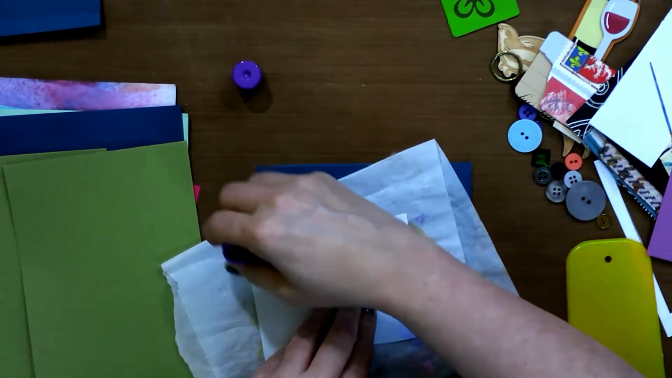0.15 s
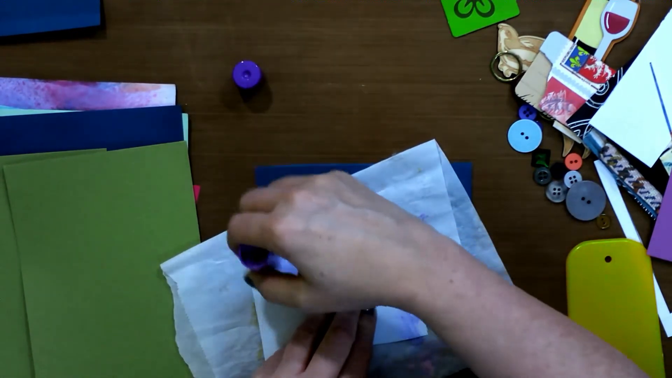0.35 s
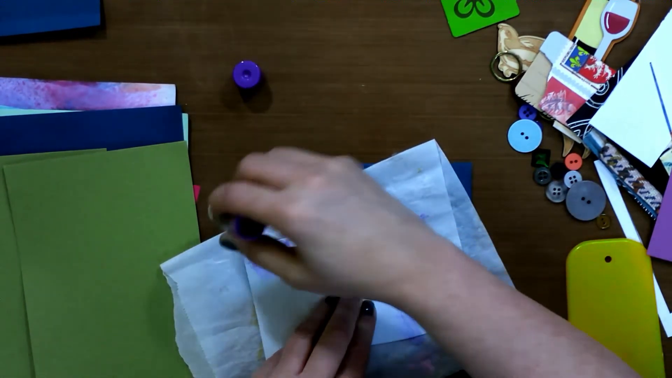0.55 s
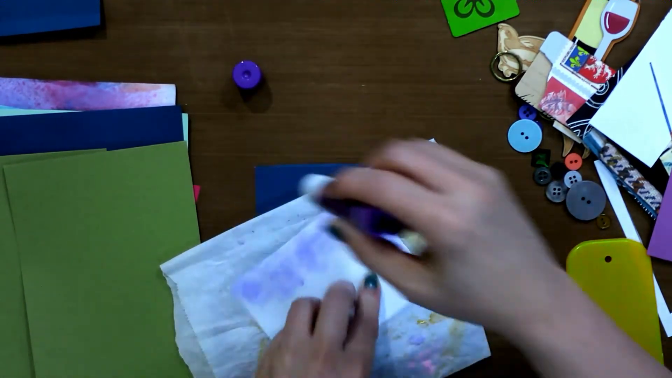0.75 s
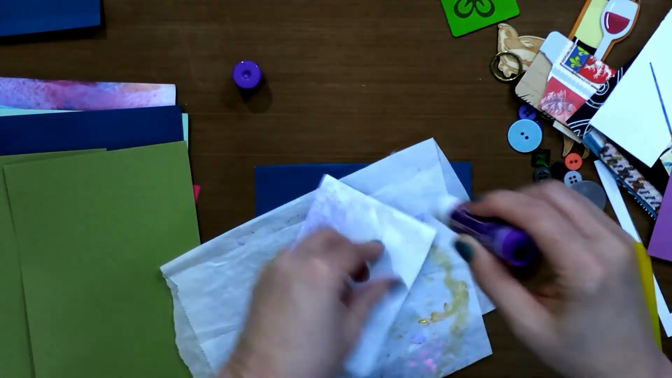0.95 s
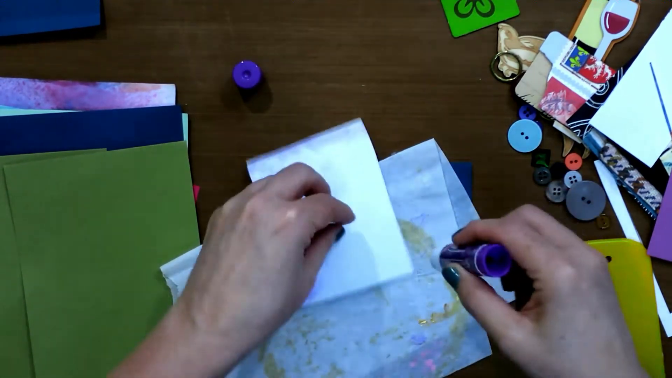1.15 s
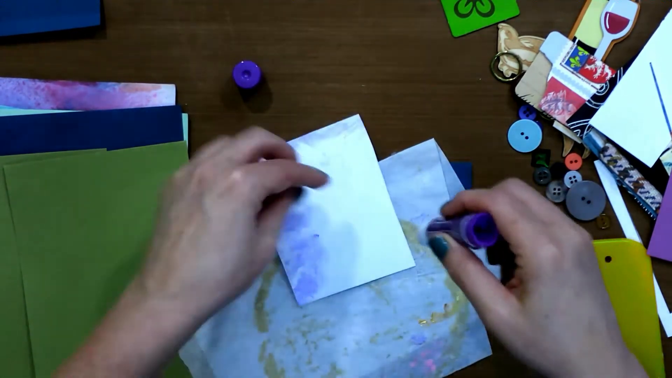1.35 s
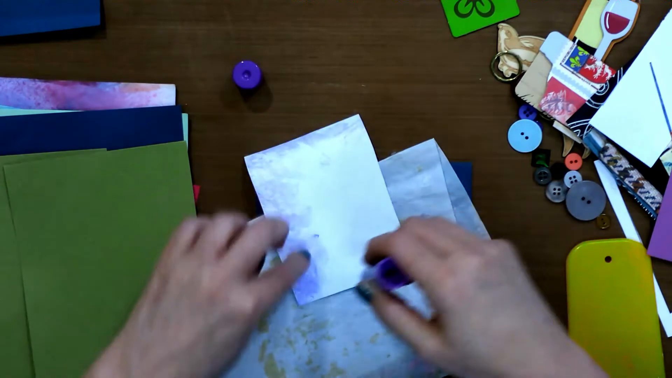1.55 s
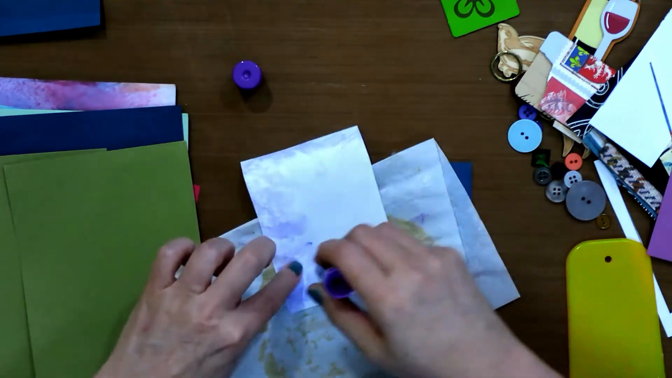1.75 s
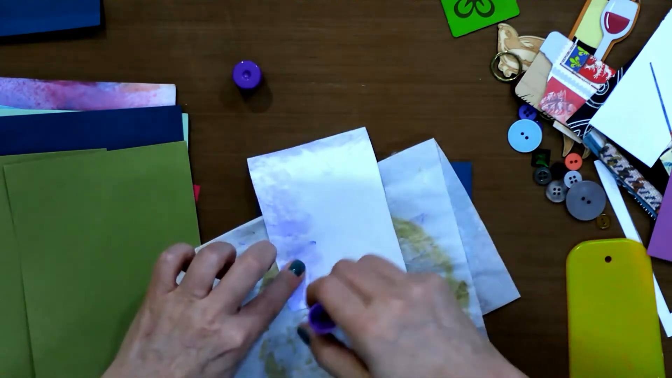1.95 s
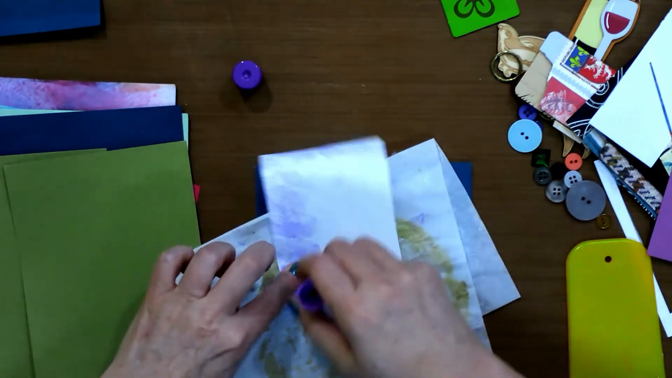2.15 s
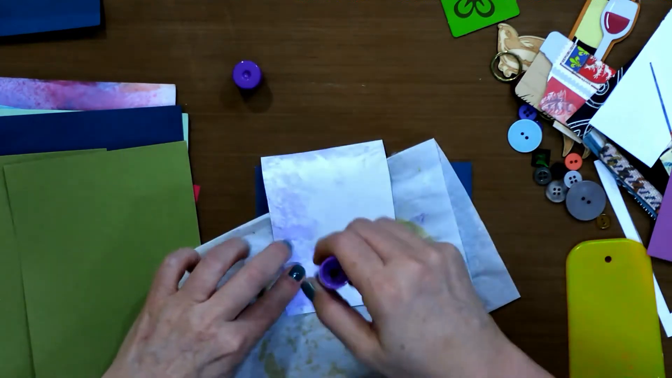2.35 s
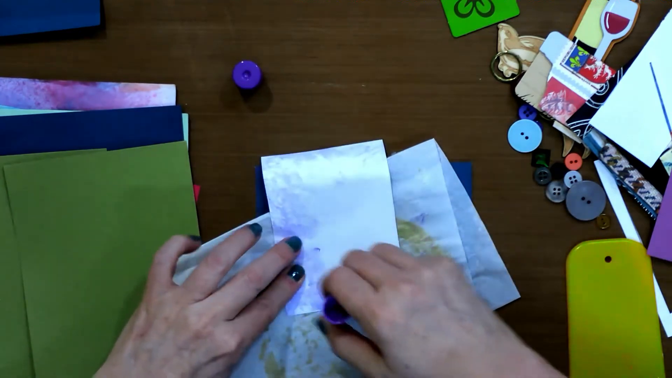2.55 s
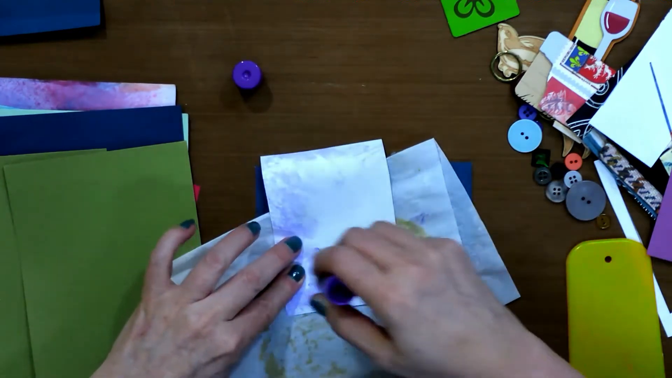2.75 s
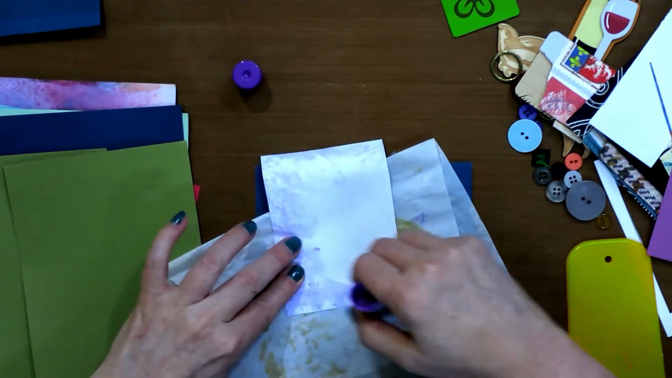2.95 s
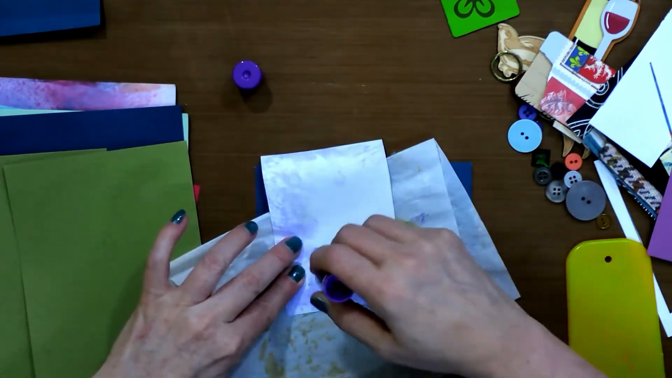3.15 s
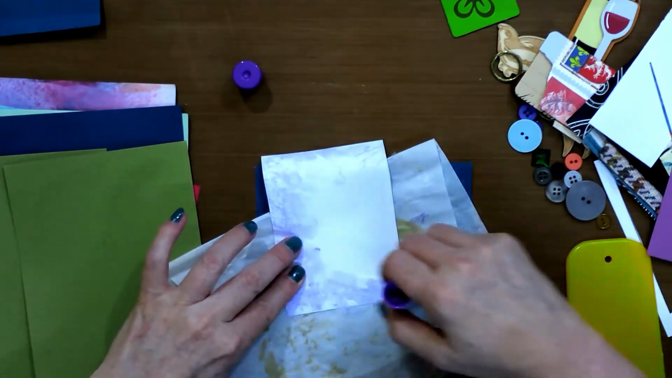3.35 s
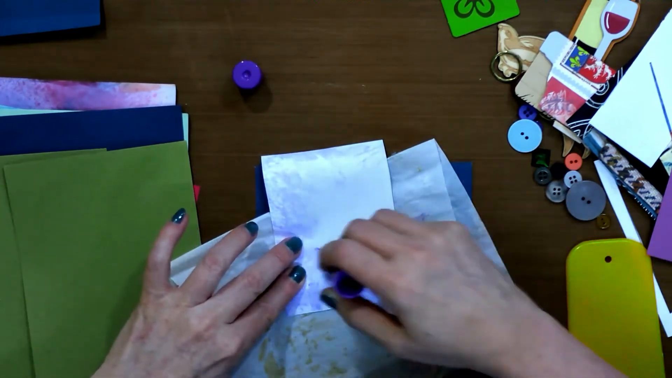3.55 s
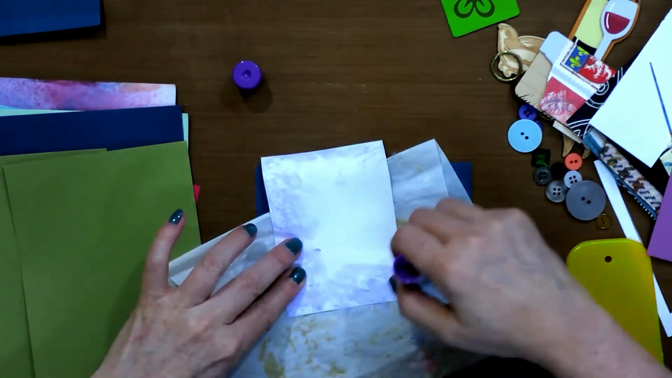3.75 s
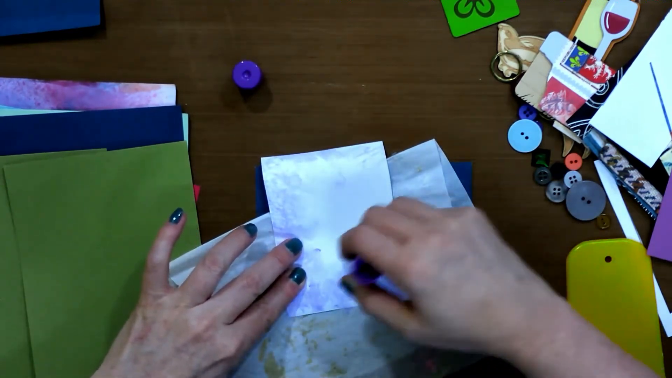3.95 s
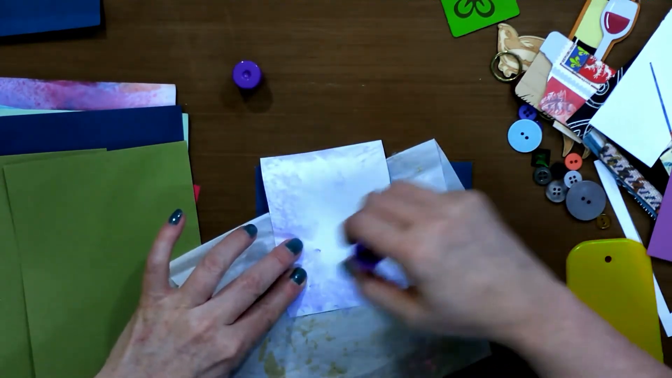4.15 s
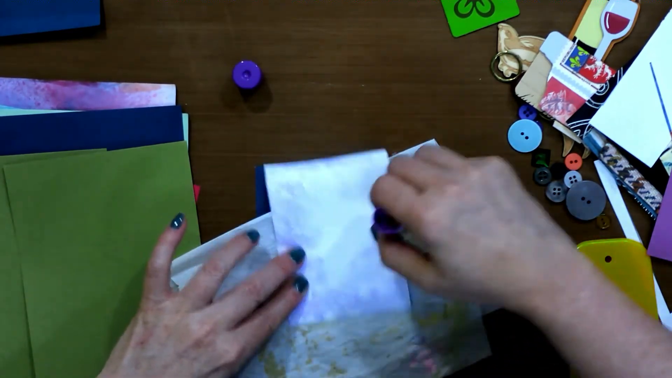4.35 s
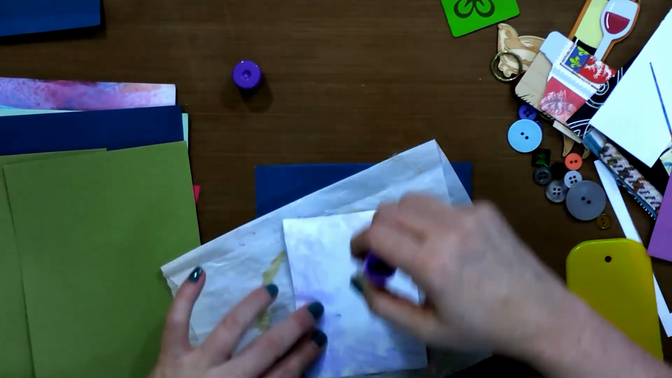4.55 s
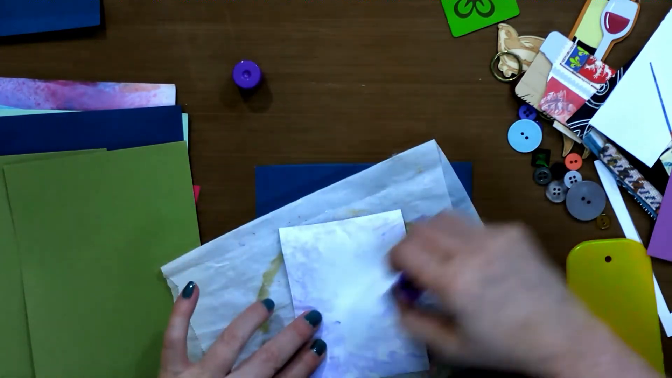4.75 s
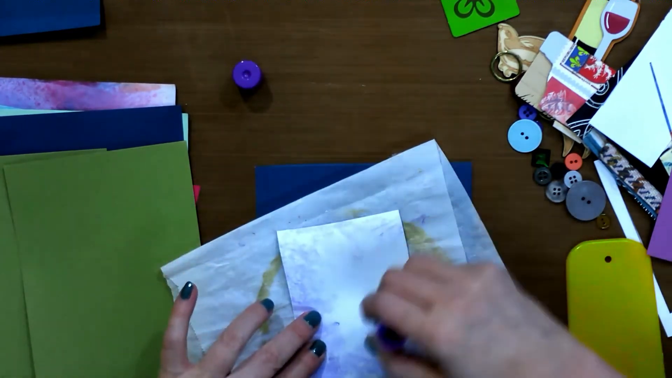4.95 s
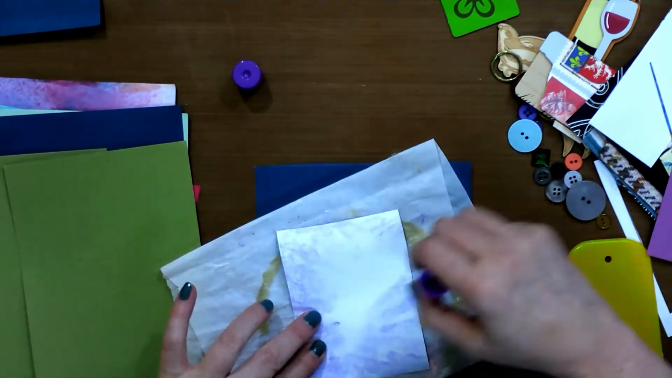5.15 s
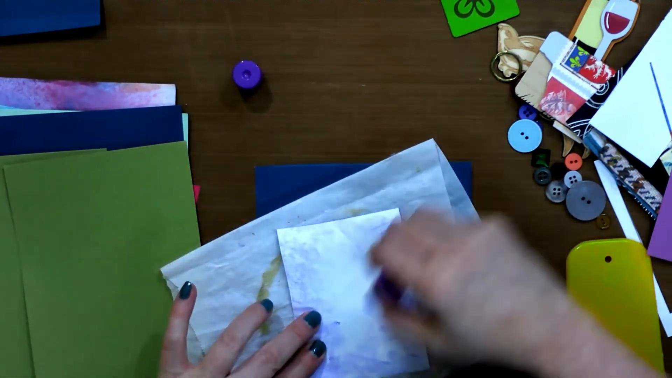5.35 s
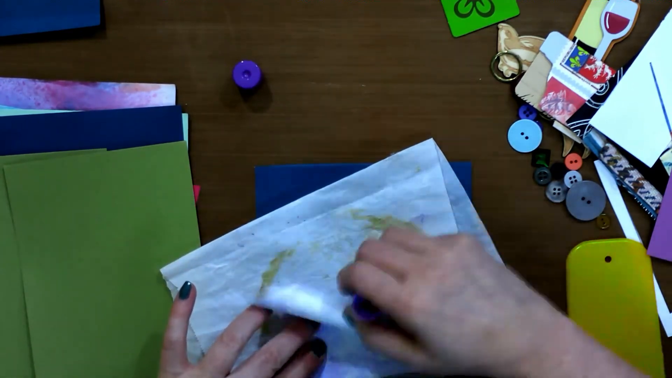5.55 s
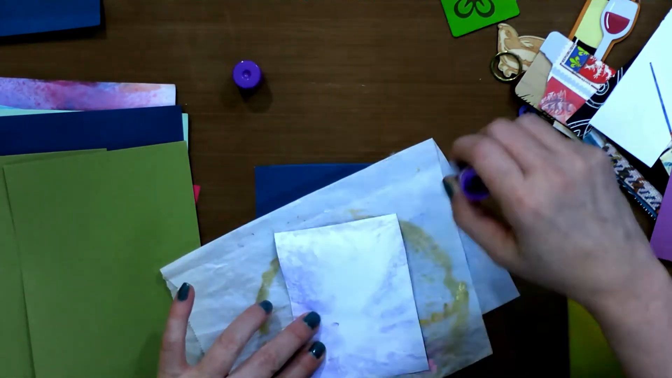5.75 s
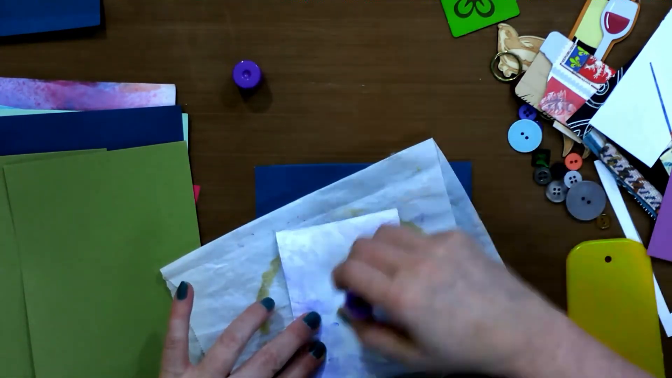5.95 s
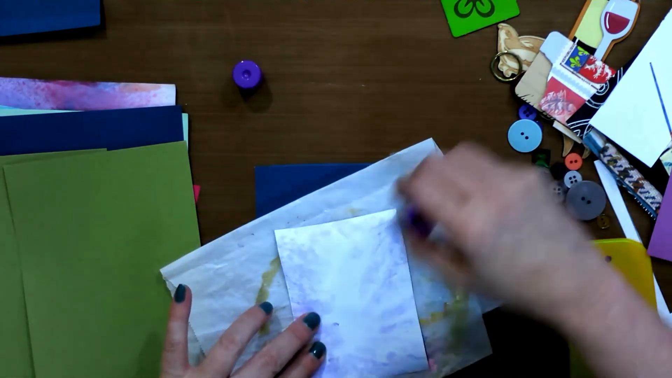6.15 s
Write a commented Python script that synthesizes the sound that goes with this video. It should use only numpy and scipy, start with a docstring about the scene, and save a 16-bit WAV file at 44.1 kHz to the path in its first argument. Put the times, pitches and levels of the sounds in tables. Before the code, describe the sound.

A glue stick rubs over paper in quick, crackly strokes, knocking dully on a wooden desk in a quiet room.

```python
"""A wooden desk in a small quiet room: a glue stick is drawn over a paper card lying on tissue paper,
about three strokes a second. Each landing is an impact that excites the modes of the desk, which also
sways on its legs. Each drag makes friction noise, a hiss of fibres over the rasp of the sheet; creases
buckle with small snaps, and the tacky glue sometimes squeaks by stick-slip.
Once the card is turned round with a sharp click."""
import sys
import numpy as np
from scipy import signal
from scipy.fft import rfft, irfft, next_fast_len
from scipy.io import wavfile
from scipy.ndimage import uniform_filter1d, map_coordinates

SR = 44100
rng = np.random.default_rng(int(sys.argv[2]) if len(sys.argv) > 2 else 0)


def store_wav(level_fs):
    """Save 16-bit WAV to argv[1]."""
    pcm = np.round(np.clip(np.atleast_2d(level_fs), -1, 1) * 32767)
    wavfile.write(sys.argv[1], SR, pcm.T.astype(np.int16))


N = 273682

# reverberation time of the room: f/Hz, T60/s
ROOM_T60 = [(150, 0.87), (500, 0.54), (1300, 0.63), (3500, 0.36), (8000, 0.34), (15000, 0.095)]
# early reflections of a knock: delay/s, gain
KNOCK_ECHOES = [(.0074, .24), (.0139, 0.032), (.026, .3), (.0495, .33)]
# direct path of a click and two reflections off a near surface: delay/s, gain
CLICK_PATHS = [(0, 0.96), (0.0081, 0.23), (0.0108, 0.2)]

# spectral shapes: f/Hz, relative density level/dB
AIR_SPECTRUM = [(18, -44), (30, -14), (58, -12.5), (124, -7.5), (233, -24.5), (345, -19), (449, -26.5),
                (499, -13), (584, -25), (1500, -25.5), (1670, -31.5), (1860, -32), (16000, -48)]  # room noise
HISS_SPECTRUM = [(1500, -64), (3000, 4.5), (4200, 5.5), (5500, 1), (8000, 2), (10000, -4.5), (12500, -3.5),
                 (15500, -7.5)]  # paper fibres rubbing
SKID_SPECTRUM = [(4000, -16.5), (7000, -6.5), (8300, -5), (9600, -9), (12200, -4.5), (14000, -10),
                 (15800, -13.5)]  # fibres in fast sliding
RASP_SPECTRUM = [(200, -4), (500, 0), (800, -3), (1200, 7.5), (1700, -3), (2300, 0), (3300, -4), (4800, -9),
                 (9000, -38)]  # the rubbed sheet
LURCH_SPECTRUM = [(4, -7), (11, -4.5), (25, -7), (40, -28.5), (100, -32), (250, -60), (600, -120)]
CRACK_SPECTRUM = [(800, -26), (2500, -1.5), (5000, 0.5), (8000, 2), (15000, 1.5), (17000, -34.5)]
FLAP_SPECTRUM = [(300, -15), (1200, -1.5), (2400, -8), (5000, -22.5)]
CRUNCH_SPECTRUM = [(400, 5.5), (1200, -8.5), (3000, -4.5), (7000, -7.5), (15000, -11)]

# normal modes: f/Hz, relative level/dB, T60/s
CARD_MODES = [(1150, -20, 0.04), (1490, -14, 0.023), (1950, -20, 0.022), (2320, -3.5, 0.028),
              (2720, 0, 0.009), (3130, 3, 0.0076), (3850, -6, 0.0078), (5360, -14, 0.0072)]  # the stiff card
DESK_MODES = [(76.4, -53.5, 1), (111.9, -35.5, 0.2), (127.5, -18, 0.31), (160.8, -10.5, 0.11),
              (236.5, -19, 0.55), (260.1, -17, 0.36), (287, -13.5, 0.29), (289, 5.5, 0.027),
              (354.5, -26, 0.72), (403.7, -4.5, 0.07), (438, -31.5, 0.48), (548, -19.5, 0.085),
              (588, -37, 0.41), (662, -46.5, 0.5), (748, -28.5, 0.24), (870, -45, 0.28)]  # the wooden desk
THUD_MODES = [(567, 2.5, 0.037), (631, 5, 0.03), (897, -1, 0.039)]  # added by a hard impact

# envelope of the desk rocking on its legs: t/s, level/dB
SWAY_ENVELOPE = [(0.0, -55.5), (0.38, -49), (0.8, -54.5), (0.94, -64), (1.57, -70.5), (1.73, -51.5),
                 (1.85, -58), (1.99, -46.5), (2.26, -51), (2.33, -48.5), (2.52, -48), (2.62, -50),
                 (4.54, -49), (4.59, -55), (5.22, -45), (5.48, -56.5), (6.12, -49), (6.15, -57)]
# flicks and taps of the card: t/s, level/dB
CARD_TAPS = [(0.988, -18.5), (1.533, -44), (5.4833, -26.5), (5.547, -41)]
# the glue sticks and slips: t/s, duration/s, f/Hz, level/dB
GLUE_SQUEAKS = [(3.562, 0.01, 1074, -45.5), (5.467, 0.0091, 2320, -41.5), (5.846, 0.046, 1344, -52.5),
                (5.88, 0.027, 1190, -51.5), (5.981, 0.098, 1180, -53.5), (6.064, 0.24, 1234, -55.5)]
# a crease gives or the glue lets go: t/s, crack level/dB, relative flap level/dB
LOUD_SNAPS = [(0.0197, -22, -13.5), (0.0602, -31.5, -20), (0.064, -31, -27), (0.165, -37.5, -4),
              (0.2519, -35.5, -9), (0.299, -29, -12), (0.3072, -35, -8), (0.3202, -32, -10),
              (0.331, -28.5, -26), (0.3788, -31, -9), (0.5671, -24.5, -27), (0.6583, -33.5, -8),
              (0.7528, -31.5, -19), (0.8599, -31.5, -35), (1.58, -31.5, -10), (2.3096, -36, -10),
              (2.3518, -39, -7), (2.799, -40.5, -8), (2.811, -39.5, -0.5), (3.1556, -36, -26),
              (3.1916, -36, -18), (3.204, -37.5, -11), (3.5279, -40, -11), (3.5625, -40.5, -7),
              (3.7914, -38.5, -18), (3.856, -36.5, -7), (3.8694, -35.5, -12), (4.0975, -36.5, -28),
              (4.158, -35, -3.5), (4.1715, -28.5, -18), (4.3653, -39.5, -5), (4.4837, -37, -20),
              (4.5418, -36, -2.5), (4.59, -36.5, 3.5), (4.6197, -33.5, -13), (4.6426, -30, -10),
              (4.8535, -37, -11), (4.8713, -37, -9), (4.8998, -36, -11), (4.909, -32, -22),
              (4.9275, -26.5, -30), (5.189, -31.5, -12), (5.248, -34.5, -11), (5.2935, -35, 0),
              (5.778, -36, -5), (5.9106, -23.5, -36)]
# the stick drags or a sheet slides: t/s, duration/s, final hiss/dB, final rasp/dB, swell of hiss/dB
DRAGS = [(0.0, 0.076, -53, -57, -8), (0.096, 0.15, -67, -70, -4), (0.251, 0.099, -54.5, -55.5, 12.5),
         (0.389, 0.3143, -47.5, -57, 9.5), (0.731, 0.053, -55, -56.5, 2), (0.86, 0.065, -79, -66.5, -13),
         (0.946, 0.01, -58.5, -57.5, 2), (1.413, .1, -76.5, -74.5, -2), (1.522, 0.11, -73.5, -64, -3),
         (1.667, 0.059, -64, -65.5, 5), (1.96, 0.047, -58, -53, 2.5), (2.338, 0.092, -67.5, -64.5, 2),
         (2.684, 0.146, -70.5, -67, -0.5), (3.033, 0.05, -64, -63.5, 5), (3.136, 0.069, -58.5, -59, -0.5),
         (3.435, .15, -62.5, -62.5, 8.5), (3.786, 0.089, -59, -59, 3.5), (4.087, 0.11, -57, -61, 0),
         (4.156, .16, -50, -56.5, 2.5), (4.352, 0.17, -68, -64, -4.5), (4.53, 0.13, -59.5, -59.5, 1),
         (4.833, 0.079, -52, -53.5, 10), (5.142, .195, -62.5, -53, 2.5), (5.421, 0.061, -44.5, -52, 1),
         (5.543, 0.28, -84, -69, -3), (5.782, 0.13, -45, -52, 12.5), (5.977, 0.08, -88, -65.5, -7),
         (6.141, 0.058, -52, -61, 8)]
# the stick lands, or a finger bumps the desk:
# t/s, knock level/dB, hardness/dB, scuff level/dB, hiss of the first slip/dB
IMPACTS = [(0.231, -27.5, -7, -48.5, -64), (1.666, -45.5, -38.5, -61, -64.5),
           (1.952, -24.5, -8.5, -54.5, -57.5), (2.304, -24.5, -10, -49, -56),
           (2.638, -26.5, -30, -47.5, -64), (2.993, -27, -25, -47.5, -58), (3.134, -49.5, 8, -56, -58),
           (3.419, -31.5, -40, -48, -52), (3.765, -28, -18, -47, -60), (4.07, -31, -23, -45.5, -52),
           (4.512, -32, -27, -50, -53.5), (4.816, -24.5, -1, -47.5, -52.5), (5.105, -24, -12, -43, -53.5),
           (5.386, -56, -10, -48, -54), (5.778, -24, -6, -44.5, -51.5), (6.126, -22, -4, -44.5, -56.5)]

ATTACK_S, RELEASE_S = 0.0058, 0.017  # a stroke takes hold and lets go
TAIL_DB, TAIL_DB_PER_S = -8.5, 113  # the stroke's sound dying away in the room
CRINKLES_PER_S, CRINKLE_OVER_RASP_DB, CRINKLE_SPREAD_DB, CRINKLE_FLAP_DB = 18, 14, 3.5, -12.5
TOP_HZ = 15950


def amp(db):
    """Amplitude ratio of a level."""
    return 10 ** (np.asarray(db) / 20)


def unit_rms(x):
    """Normalisation to rms 1."""
    return x / np.sqrt(np.mean(x ** 2) + 1e-20)


def unit_peak(x):
    """Normalisation to peak 1."""
    return x / (np.abs(x).max() + 1e-20)


def along(points, hz):
    """Interpolation of (f/Hz, value) points on a logarithmic frequency axis."""
    knots_hz, values = np.transpose(points)
    return np.interp(np.log(hz + 1), np.log(knots_hz + 1), values)


def filtered(x, response):
    """Linear filtering: the spectrum is multiplied by a frequency response."""
    size = next_fast_len(len(x) + 8192)
    return irfft(rfft(x, size) * response(np.fft.rfftfreq(size, 1 / SR)), size)[:len(x)]


def coloured(x, spectrum):
    """Spectral shaping by (f/Hz, level/dB) points, at rms 1."""
    return unit_rms(filtered(x, lambda hz: amp(along(spectrum, hz))))


def resonance(x, centre_hz, width_hz):
    """Forced response of one damped oscillator."""
    return filtered(x, lambda f: 1j * f * width_hz / (centre_hz ** 2 - f * f + 1j * f * width_hz))


def wobble(rate):
    """Smooth random modulation with `rate` knots a second."""
    knots = rng.standard_normal(int(N * rate / SR) + 4)
    return map_coordinates(knots, [np.arange(N) * rate / SR])


def add(track, start_s, sound):
    """Superposition of a sound on a track."""
    i = max(0, round(start_s * SR))
    track[i:i + len(sound)] += sound[:max(0, N - i)]


def ring(modes, t, scatter_db):
    """Free vibration: a sum of damped modes, each struck with a slightly random strength."""
    return sum(amp(db + scatter_db * rng.standard_normal() - 60 * t / t60) * np.sin(2 * np.pi * hz * t)
               for hz, db, t60 in modes)


def grains(rate, spread_db):
    """Shot noise: `rate` tiny slips a second, of unequal size, at rms 1."""
    slips = (rng.random(N) < rate / SR) * rng.choice([-1, 1], N)
    return unit_rms(slips * amp(spread_db * rng.uniform(-1.5, 1.9, N)))


def background():
    """Ambient noise: the broad spectrum of still air and a faint mains hum."""
    hum = np.sin(2 * np.pi * 120 * np.arange(N) / SR) * amp(1.5 * wobble(5))
    air = coloured(rng.standard_normal(N), AIR_SPECTRUM)
    return amp(-66.5) * air + amp(-67.5) * hum


def reverberation(x):
    """The diffuse field of the room decays exponentially, the treble first."""
    hz, t, noise = signal.stft(rng.standard_normal(SR // 2), SR, nperseg=256)
    decay = amp(-60 * t / along(ROOM_T60, hz)[:, None])
    tail = signal.istft(noise * decay, SR, nperseg=256)[1]
    tail = np.pad(tail, (round(0.007 * SR), 0))
    return signal.fftconvolve(x, tail / np.linalg.norm(tail))[:N]


def desk_sway():
    """Forced vibration: the pushed desk lurches and rocks at its lowest resonance."""
    hz = 26.3 + 1.195 * wobble(12)
    rocking = np.sqrt(2) * np.sin(2 * np.pi * np.cumsum(hz) / SR) * amp(3.05 * wobble(7.3))
    lurch = coloured(rng.standard_normal(N), LURCH_SPECTRUM)
    level_db = np.interp(np.arange(N) / SR, *np.transpose(SWAY_ENVELOPE))
    return amp(level_db) * (amp(-1) * rocking + amp(0.5) * lurch)


def glue_squeaks():
    """Stick-slip: irregular slips of tacky glue drive a resonance and chatter in a narrow band."""
    out = np.zeros(N)
    for start_s, length_s, hz, db in GLUE_SQUEAKS:
        n = round(length_s * SR)
        slips = grains(rate=1500, spread_db=0.5)[:n + 2000]  # extra samples let the resonance build
        chatter = resonance(resonance(slips, hz, hz / 4), hz, hz / 3)[-n:]
        add(out, start_s, amp(db) * unit_rms(chatter) * signal.windows.tukey(n, 0.5))
    return out + amp(-13.5) * reverberation(out)


def card_clicks():
    """Impulse response: a tap on its edge rings the card's damped modes, and a near surface reflects."""
    out, t = np.zeros(N), np.arange(SR // 8) / SR
    band = signal.butter(2, [700, 7500], "band", fs=SR, output="sos")
    for start_s, db in CARD_TAPS:
        clack = unit_peak(signal.sosfilt(band, ring(CARD_MODES, t, scatter_db=1)))
        for delay_s, gain in CLICK_PATHS:
            add(out, start_s + delay_s, amp(db) * gain * clack)
    return out + amp(-8.5) * reverberation(out)


def crinkles():
    """Random buckling within each stroke, louder under a harder one: rows as in LOUD_SNAPS."""
    rows = []
    for start_s, length_s, _, rasp_db, _ in DRAGS:
        delays = (np.arange(8) + rng.random(8)) / CRINKLES_PER_S
        levels = rasp_db + CRINKLE_OVER_RASP_DB + CRINKLE_SPREAD_DB * rng.standard_normal(8)
        rows += [(start_s + delay_s, db, CRINKLE_FLAP_DB)
                 for delay_s, db in zip(delays, levels) if delay_s < length_s]
    return rows


def paper_snaps():
    """Sudden release of strain: a crack coloured by one resonant facet, and a duller flap of the sheet."""
    out, t = np.zeros(N), np.arange(SR // 40) / SR
    crack_decay = np.exp(-t / 0.00076) + 0.086 * np.exp(-t / 0.0097)
    for start_s, db, flap_db in LOUD_SNAPS + crinkles():
        crack_noise, flap_noise = rng.standard_normal((2, len(t)))
        facet = crack_noise + 0.88 * resonance(crack_noise, rng.uniform(4250, 8100), width_hz=1500)
        crack = unit_peak(coloured(facet, CRACK_SPECTRUM) * crack_decay)
        flap = unit_peak(coloured(flap_noise, FLAP_SPECTRUM) * np.exp(-t / 0.0025))
        add(out, start_s + 0.00078, amp(db) * (crack + amp(min(flap_db, 0) - 1) * flap))
    return out


def impact_scuffs():
    """Compression: each impact presses the layers of paper together with a short crunch."""
    out, t = np.zeros(N), np.arange(SR // 10) / SR
    crunch = coloured(grains(rate=4100, spread_db=3.5), CRUNCH_SPECTRUM)
    rise_s = 0.002
    pulse = t / rise_s * np.exp(1 - t / rise_s)
    for start_s, _, _, scuff_db, _ in IMPACTS:
        i = round(start_s * SR)
        add(out, start_s - 0.001, amp(scuff_db - 1.5) * pulse * crunch[i - len(t):i])
    return out


def flexing(x, depth_db):
    """Spectral modulation: the sheet's many small resonances shift as it bends under the hand."""
    spectra = signal.stft(x, nperseg=512)[2]
    ripple = uniform_filter1d(rng.standard_normal(spectra.shape), size=4, axis=0)  # over frequency
    ripple = uniform_filter1d(ripple, size=9, axis=1)  # over time
    return unit_rms(signal.istft(spectra * amp(depth_db * unit_rms(ripple)), nperseg=512)[1][:N])


def drag_envelope(start_s, length_s, swell_db):
    """Friction noise follows the motion: it takes hold, swells or ebbs, then dies away in the room."""
    t = np.arange(N) / SR - start_s
    attack = np.clip(t / ATTACK_S, 0, 1)
    swell = amp(swell_db * (np.clip(t / length_s, 0, 1) - 1))
    after_s, tail = np.maximum(t - length_s, 0), amp(TAIL_DB)
    release = (1 - tail) * np.exp(-after_s / RELEASE_S) + tail * amp(-TAIL_DB_PER_S * after_s)
    return attack * swell * release


def sliding_levels():
    """Incoherent sources add in power: hiss and rasp in dB of the drags and each impact's first slip."""
    hiss_power, rasp_power = np.zeros((2, N)) + amp(-120) ** 2
    for start_s, length_s, hiss_db, rasp_db, swell_db in DRAGS:
        hiss_power += (amp(hiss_db) * drag_envelope(start_s, length_s, swell_db)) ** 2
        rasp_power += (amp(rasp_db) * drag_envelope(start_s, length_s, 0.67 * swell_db)) ** 2
    t = np.arange(SR // 3) / SR
    lead_s, slip_s = 0.0048, 0.0095  # the slip begins just ahead of the knock
    release = np.exp(-np.maximum(t - slip_s, 0) / 0.01)
    slip = np.minimum(t / 0.0055, 1) * (release + amp(-14.5 - TAIL_DB_PER_S * t))
    for start_s, _, _, scuff_db, hiss_db in IMPACTS:
        add(hiss_power, start_s - lead_s, (amp(hiss_db) * slip) ** 2)
        add(rasp_power, start_s - lead_s, (amp(scuff_db - 4) * slip) ** 2)
    return 10 * np.log10(hiss_power), 10 * np.log10(rasp_power)


def paper_friction():
    """Sliding friction: fibres hiss and the sheet rasps. A slow drag crackles, a fast one is brighter."""
    hiss_db, rasp_db = sliding_levels()
    grip = amp(1.94 * wobble(70))  # the drag is never quite even
    slow = 1 / (1 + amp(1.8 * (hiss_db + 56)))  # the hiss level stands for speed
    fast = 1 / (1 + amp(-3 * (hiss_db + 50.5)))
    crackle = (0.17 + 0.92 * slow) * grains(rate=450, spread_db=1)
    fibres = unit_rms(grains(rate=20000, spread_db=1) + crackle) / np.sqrt(0.5 + 0.55 * slow)
    sheet = unit_rms(grains(rate=9000, spread_db=0.5) + 0.5 * grains(rate=300, spread_db=11))
    skid = coloured(grains(rate=12000, spread_db=9), SKID_SPECTRUM)
    hiss = np.sqrt(1 - fast) * coloured(fibres, HISS_SPECTRUM) + np.sqrt(fast) * skid
    hiss = flexing(hiss, depth_db=2.4)
    rasp = flexing(coloured(sheet, RASP_SPECTRUM), depth_db=3)
    return grip * (amp(hiss_db) * hiss + amp(rasp_db) * rasp)


def desk_knocks():
    """Impact excitation: the stick or a finger rings the desk; a harder blow adds a higher, short thud."""
    wood, t = np.zeros(N), np.arange(SR // 2) / SR
    push = unit_peak(np.sin(2 * np.pi * 92 * t) * t * np.exp(-t / 0.0068))  # the hand's weight follows
    for start_s, db, hardness_db, _, _ in IMPACTS:
        body = unit_peak(ring(DESK_MODES, t, scatter_db=1.86) * (1 - np.exp(-t / 0.0019)))
        thud = unit_peak(ring(THUD_MODES, t, scatter_db=2) * (1 - np.exp(-t / 0.001)))
        add(wood, start_s + 0.00209, amp(db - 0.5) * (body - amp(hardness_db - 7) * thud))
        add(wood, start_s + 0.0046, amp(db - 12.5) * push)
    heard = wood.copy()
    for delay_s, gain in KNOCK_ECHOES:
        add(heard, delay_s, gain * wood)
    return heard + amp(-15.5) * reverberation(wood)


def scene():
    """Superposition of paper, desk, glue and room in one channel."""
    paper = paper_friction() + paper_snaps() + impact_scuffs()
    paper += amp(-15) * reverberation(paper)
    return (paper + desk_knocks() + card_clicks() + glue_squeaks() + desk_sway() + background())[None]


def record(dry):
    """An ideal low-pass filter removes everything above the band limit."""
    return filtered(dry[0], lambda hz: hz < TOP_HZ)[None]


dry = scene()
out = record(dry)
store_wav(out)
```